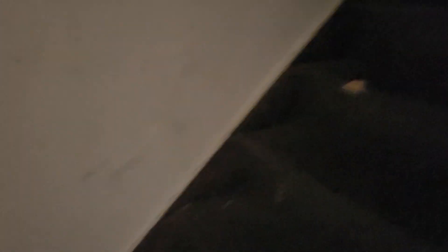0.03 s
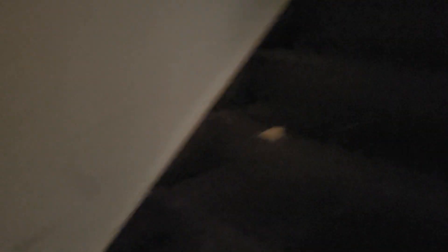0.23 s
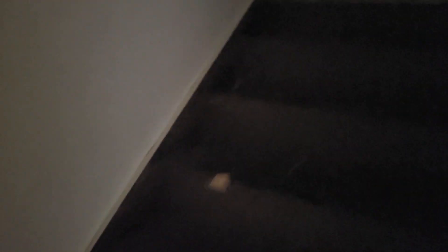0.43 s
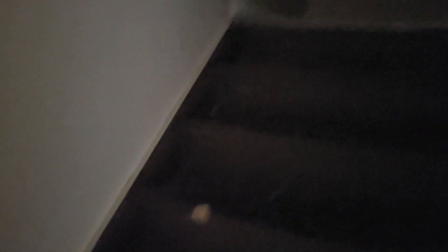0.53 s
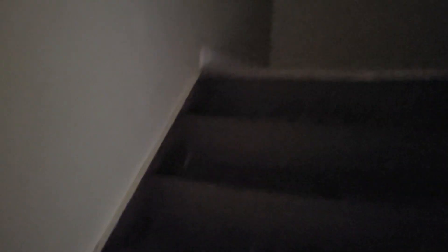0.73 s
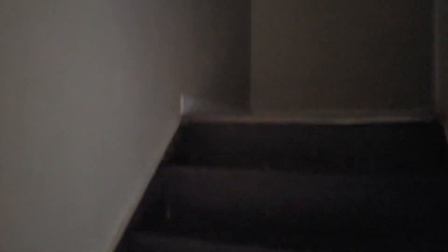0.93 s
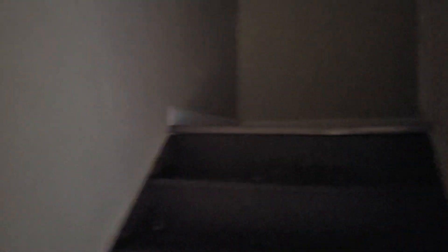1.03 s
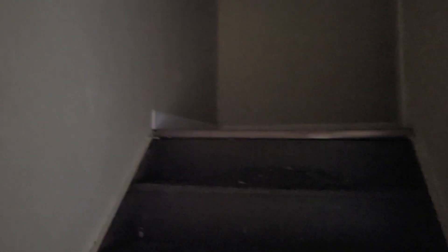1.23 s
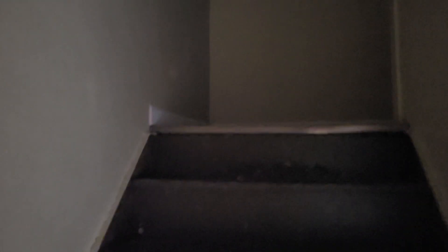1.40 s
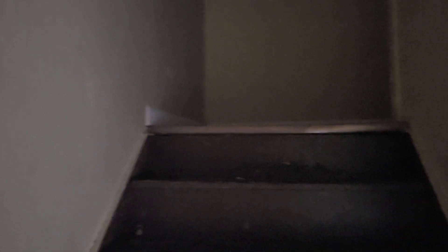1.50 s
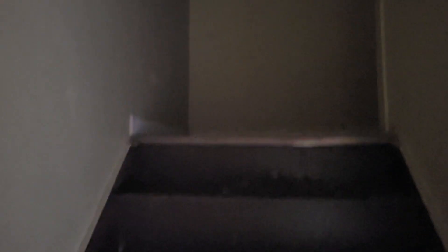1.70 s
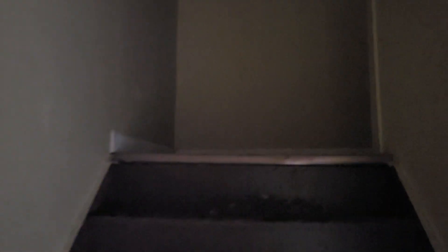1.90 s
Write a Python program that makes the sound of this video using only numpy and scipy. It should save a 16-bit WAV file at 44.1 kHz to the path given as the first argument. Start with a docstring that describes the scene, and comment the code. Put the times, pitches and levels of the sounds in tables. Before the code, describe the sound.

Footsteps climb a narrow carpeted wooden staircase: a firm thump, a scuffing step, a sharp tap, then softer steps. Clothes rustle faintly close to the handheld microphone, and the small stairwell adds a short, boomy echo.

```python
"""A narrow carpeted wooden staircase, heard from the phone in the climber's hand.
Each footfall thuds the flexing tread and the sole taps it; shoes scuff and the wood rumbles under the
weight. Close to the microphones, clothes rustle and a few small ticks sound. The stairwell answers
with a boom, a flutter echo and a short tail, over a quiet room tone."""
import sys
import numpy as np
from scipy import signal
from scipy.fft import rfft, irfft
from scipy.io import wavfile
from scipy.ndimage import uniform_filter1d

SR = 44100
rng = np.random.default_rng(int(sys.argv[2]) if len(sys.argv) > 2 else 0)


def file_out(sig):
    """Save sig as 16-bit WAV at sys.argv[1]."""
    # one column per channel
    cols = np.atleast_2d(sig).T
    # limit, then scale
    lim = np.clip(cols, -1, 1)
    pcm = np.round(lim * 32767).astype(np.int16)
    wavfile.write(sys.argv[1], SR, pcm)


N = 85995

# Tone colour of each source. Each row: frequency in Hz, relative level in dB.
ROOM_SPECTRUM = [(20, 8), (55, 12.5), (120, 0.5), (200, -3.5), (350, 5.5), (520, -3), (780, 5), (1300, -3),
                 (2200, -1.5), (2900, -42.5), (4800, -29), (6600, -9.5), (8200, -35), (15500, -24)]
RUSTLE_SPECTRUM = [(200, -4), (700, 2.5), (2100, 0), (3300, -2), (4800, -7), (6600, -3.5), (8200, -15.5),
                   (15000, -18)]
SWISH_SPECTRUM = [(800, -16), (2500, -8), (3500, -7), (5500, -7.5), (7600, 2), (8400, 1), (9200, -8.5),
                  (11500, -5), (14500, -6), (16000, -8)]
TICK_SPECTRUM = [(600, -11), (2000, -4), (4500, -2), (8000, -12.5), (12500, -7), (16000, -10)]
SCUFF_SPECTRUM = [(120, -10), (350, -2.5), (900, -5), (1500, -1.5), (2150, -1.5), (3300, 0), (4800, -6.5),
                  (6800, -1), (8500, -11), (15000, -20)]
RUMBLE_SPECTRUM = [(60, -16), (120, -7.5), (168, 0.5), (210, -4), (265, 0), (380, -4.5), (480, -13.5),
                   (700, -8), (1500, -66)]
TAP_SPECTRUM = [(40, -57), (130, -18), (260, -2.5), (500, -1.5), (900, -3.5), (1500, -2), (2120, -1),
                (2700, -6.5), (4000, -10), (6800, -13), (8500, -20.5), (12000, -15.5), (14200, -15),
                (15800, -25)]
# The stairwell's tail. Each row: frequency in Hz, seconds to fall 60 dB.
TAIL_DECAY = [(80, 0.33), (210, 0.37), (560, 0.61), (1500, 0.55), (3900, 0.32), (10000, 0.36)]
# Resonances of stairwell and tread. Each row: frequency in Hz, relative level in dB, seconds to fall 60 dB.
STAIRWELL_MODES = [(103, -10, 0.25), (132, -20, 0.11), (160.8, 7, 0.45), (226, -27, 0.29), (259, 0.5, .42),
                   (310, -41, 0.1), (360, 5.5, 0.49), (405, -27, 0.58), (520, -14, 0.45), (548, -6, 0.48),
                   (641, 8, 0.76), (720, -7, 0.56)]
WOOD_MODES = [(514, -10, 0.08), (788, -3, 0.064), (1080, 2.5, .05), (1460, -7, .06), (1680, -23, .08),
              (2090, 7, 0.061), (2220, 4, 0.066), (2450, -29, .08)]
# Clothes moving with the stride. Each row: time in seconds, level in dB.
RUSTLE_CONTOUR = [(0, -62), (.12, -72), (.2, -61), (.3, -54.5), (.42, -57.5), (.54, -53.5), (.65, -65.5),
                  (.77, -62.5), (.95, -50.5), (1.19, -66.5), (1.329, -60.5), (1.532, -54.5), (1.662, -62),
                  (1.78, -58), (1.95, -64)]
# Cloth swishing, soles sliding, weight rolling onto a tread.
# Each row: start in seconds, length in seconds, level in dB, rise in seconds.
CLOTH_STROKES = [(0.693, 0.0056, -67, 0.0036), (1.247, 0.019, -60, 0.0065), (1.708, 0.014, -49, 0.0033),
                 (1.843, 0.011, -53.5, 0.0051)]
SOLE_SLIDES = [(0.32, 0.026, -53.5, 0.0066), (0.784, .057, -37.5, 0.027), (0.925, 0.13, -55.5, 0.06),
               (1.241, 0.017, -52, 0.018), (1.42, .05, -68, 0.018), (1.51, .03, -62, 0.022)]
WEIGHT_ROLLS = [(0.322, .04, -41, 0.0066), (0.47, 0.093, -55, 0.016), (0.80, 0.056, -42, 0.034),
                (0.93, 0.072, -56.5, 0.015), (1.265, 0.017, -48.5, 0.017), (1.415, 0.067, -50.5, 0.0087)]
# Ticks close by. Each row: start in seconds, level in dB, left over right in dB.
CLOSE_TICKS = [(0.2433, -52, -1), (0.317, -55, -4), (0.736, -58, -15), (1.0110, -55, -29.5),
               (1.4100, -55, -11), (1.6130, -58, -2)]
# Heel and sole landings. Each row: start in seconds, thud level in dB, thud pitch in Hz, thud decay
# in cycles, tap lag in seconds, tap level in dB, tap cut-off in Hz, tap decay in seconds.
LANDINGS = [ (0.2000, -28.5, 244, 0.29, .0028, -37, 9400, 0.0018),
            (0.2090, -26.5, 242, 0.54, 0.00092, -57, 1990, 0.0027),
            (0.3232, -37, 205, 0.51, 0.0025, -39.5, 2700, 0.011),
            (0.7793, -33, 380, 0.65, .0005, -31, 2570, 0.008),
            (1.0190, -42, 479, 0.81, 0.00027, -28.5, 8600, 0.0032),
            (1.2376, -41, 148, 0.26, 0.00046, -48, 1020, 0.0041),
            (1.2600, -43.5, 234, 0.45, .001, -47, 595, 0.011),
            (1.3040, -43.5, 129, 0.98, 0.013, -44, 4200, 0.005),
            (1.4035, -47, 290, 0.97, .0005, -46.5, 5040, 0.005), ]
# The phone's microphone pair. Each row: frequency in Hz, left over right in dB.
MIC_TILT = [(100, 0.95), (1000, 0.5), (4000, 3), (7000, 1.5), (9000, -0.5), (14000, -6)]

TIME = np.arange(N) / SR
BIN_HZ = np.arange(N // 2 + 1) * SR / N


def undb(db):
    """Decibels to gain."""
    return 10 ** (np.asarray(db) / 20)


def unit(x):
    """Scale to rms 1."""
    return x / np.sqrt(np.mean(x ** 2))


def along_hz(points, hz):
    """Read (Hz, value) points on a log axis."""
    freqs, values = np.array(points, float).T
    return np.interp(np.log(hz + 1), np.log(freqs), values)


def colour(x, spectrum):
    """Minimum-phase filter with the given spectrum."""
    cepstrum = irfft(np.log(undb(along_hz(spectrum, BIN_HZ))), N)
    cepstrum[1:N // 2] *= 2
    cepstrum[N // 2:] = 0
    return irfft(rfft(x) * np.exp(rfft(cepstrum)), N)


def pan(db):
    """Channel gains, the left db above the right."""
    return undb(np.array([[db], [-db]]) / 2)


def convolve(x, response):
    """Pass a sound through a response."""
    return signal.fftconvolve(np.atleast_2d(x), np.atleast_2d(response), axes=1)[:, :N]


def diffuse(wide_hz=378, bass_width=0.25):
    """Noise at two microphones, alike in the bass and unrelated in the treble."""
    mid, side = rfft(rng.standard_normal((2, N)))
    width = np.maximum(BIN_HZ ** 2 / (BIN_HZ ** 2 + wide_hz ** 2), bass_width)
    return irfft((mid + width * side * np.array([[1], [-1]])) / np.sqrt(1 + width ** 2), N)


def place(x, start, db):
    """Place a short sound; its level is its energy spread over 5 ms."""
    x = np.atleast_2d(x)
    energy = np.mean(np.sum(x ** 2, axis=1))
    x = x * undb(db) * np.sqrt(.005 * SR / energy)
    return np.pad(x, ((0, 0), (int(start * SR), 0)))[:, :N]


def ring(modes):
    """Response of a set of decaying modes."""
    return sum(undb(db - 60 * TIME / t60) * np.cos(2 * np.pi * hz * TIME) for hz, db, t60 in modes)


def grainy(spectrum, depth_db=-1, grain_s=0.0023):
    """Noise of fibres catching and slipping."""
    catch = unit(uniform_filter1d(rng.standard_normal(N), int(grain_s * SR)))
    return unit(colour(diffuse() * undb(depth_db * catch), spectrum))


def strokes(rows, release_s=0.023):
    """Level of rubbing strokes: each rises, holds and lets go."""
    level = 0
    for start, length, db, rise in rows:
        attack = np.sqrt(np.clip((TIME - start) / rise, 0, 1))
        release = np.exp(-np.maximum(TIME - start - length, 0) / release_s)
        level += undb(db) * attack * release
    return level


def room_tone():
    """The stairwell's quiet, steady noise, all around."""
    return undb(-60.5) * unit(colour(diffuse(), ROOM_SPECTRUM))


def stairwell_tail(build_s=0.0039):
    """Dense reflections between close walls, each octave dying at its own rate."""
    noise, tail = rfft(diffuse()), 0
    octaves = 62.5 * 2. ** np.arange(9)
    for hz in octaves:
        band = along_hz([(centre, centre == hz) for centre in octaves], BIN_HZ)
        tail += irfft(noise * band, N) * undb(-60 * TIME / along_hz(TAIL_DECAY, hz))
    return unit(tail * (1 - np.exp(-TIME / build_s))) / np.sqrt(N)


def boom_and_flutter(round_trip_s=.0193, bounce_db=-8.5):
    """The direct path, the stairwell's booming modes and three echoes between stairs and ceiling."""
    response = undb(-58) * ring(STAIRWELL_MODES)
    for bounce in range(4):
        response[int(bounce * round_trip_s * SR)] += undb(bounce * bounce_db)
    return response


def clothes():
    """Cloth rubs near the microphones: a rustle with the stride, a swish now and then."""
    rustle = undb(np.interp(TIME, *np.array(RUSTLE_CONTOUR).T)) * grainy(RUSTLE_SPECTRUM)
    swish = strokes(CLOTH_STROKES) * grainy(SWISH_SPECTRUM, depth_db=3, grain_s=0.0017)
    return pan(-1.5) * rustle + pan(1) * swish


def ticks(decay_s=0.0017):
    """Tiny bright clicks close to the phone, toward the right."""
    fade = np.exp(-TIME / decay_s)
    return sum(pan(left_db) * place(colour(diffuse() * fade, TICK_SPECTRUM), start, db)
               for start, db, left_db in CLOSE_TICKS)


def scuffs():
    """Soles scrape over the treads, which rumble as the weight rolls on."""
    scrape = strokes(SOLE_SLIDES) * grainy(SCUFF_SPECTRUM)
    rumble = strokes(WEIGHT_ROLLS) * grainy(RUMBLE_SPECTRUM)
    return pan(-0.5) * scrape + rumble


def sole_taps(width=0.88):
    """The sole slaps the tread and sets the wood ringing."""
    taps = 0
    for start, _, _, _, lag, db, cutoff_hz, decay_s in LANDINGS:
        noise = diffuse()
        noise = width * noise + (1 - width) * noise.mean(axis=0)
        slap = colour(noise * np.exp(-TIME / decay_s), TAP_SPECTRUM)
        lowpass = signal.butter(2, cutoff_hz, fs=SR, output="sos")
        taps += place(signal.sosfilt(lowpass, slap), start + lag, db)
    return taps + undb(-52) * convolve(taps, ring(WOOD_MODES))


def tread_thuds(low_cut_hz=60):
    """Below the phone, each tread flexes under the foot in a heavily damped swing."""
    thuds = 0
    for start, db, hz, cycles, *_ in LANDINGS:
        age = TIME * hz / cycles
        flex = -age * np.exp(-age) * np.sin(2 * np.pi * hz * TIME)
        thuds += place(flex, start, db)
    return signal.sosfilt(signal.butter(2, low_cut_hz, "high", fs=SR, output="sos"), thuds)


def scene():
    """Feet and clothes in the stairwell, over the room tone."""
    tail = stairwell_tail()
    thud, tap, tick = tread_thuds(), sole_taps(), ticks()
    rub_send = undb(-5.5)
    friction = (scuffs() + clothes()) / np.hypot(1, rub_send)
    # The footfalls stir the tail most; the close ticks stay nearly dry.
    send = undb(-1.5) * (thud + tap) + rub_send * friction + undb(-15) * tick
    booming_thud = convolve(thud, boom_and_flutter())
    return booming_thud + tap + tick + friction + convolve(send, tail) + room_tone()


def record(dry, top_hz=15900):
    """The phone's two microphones: the right is the brighter one, and the top is cut steeply."""
    balance_db = along_hz(MIC_TILT, BIN_HZ)
    heard = irfft(rfft(dry) * undb(np.array([balance_db, -balance_db]) / 2), N)
    return signal.sosfilt(signal.ellip(10, .2, 80, top_hz, fs=SR, output="sos"), heard)


dry = scene()
out = record(dry)
file_out(out)
```